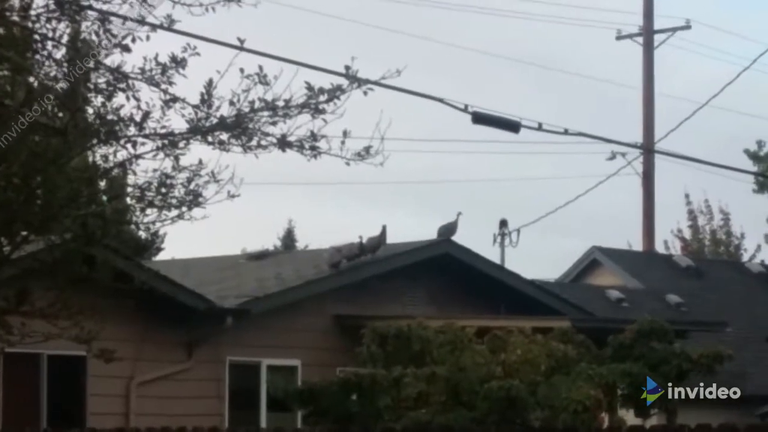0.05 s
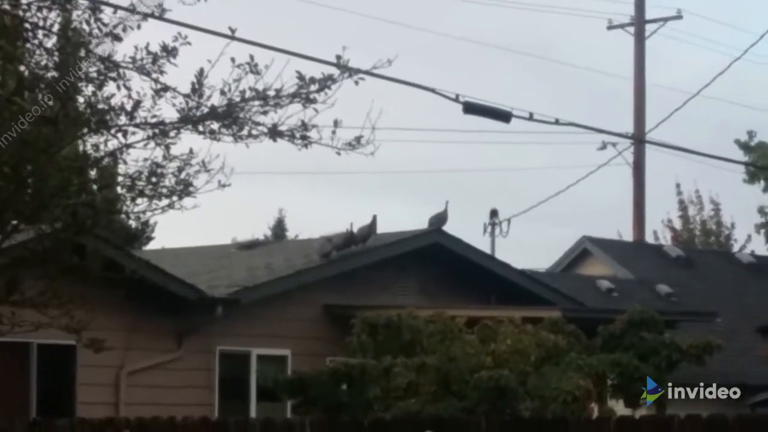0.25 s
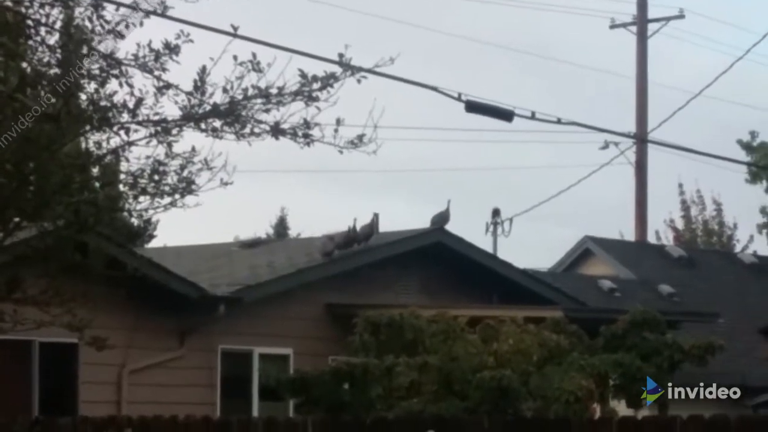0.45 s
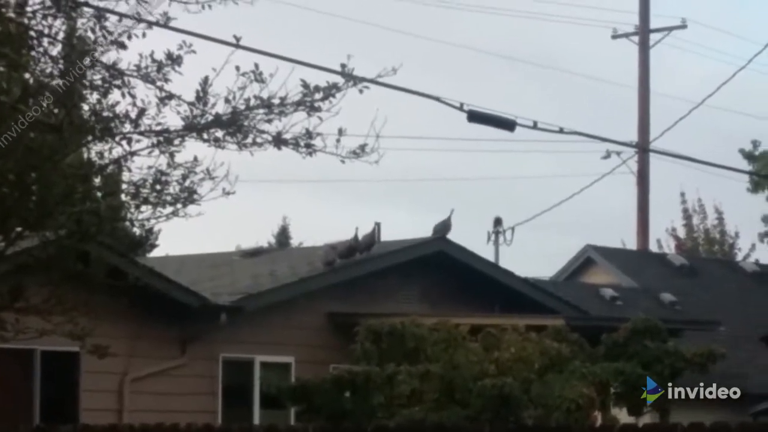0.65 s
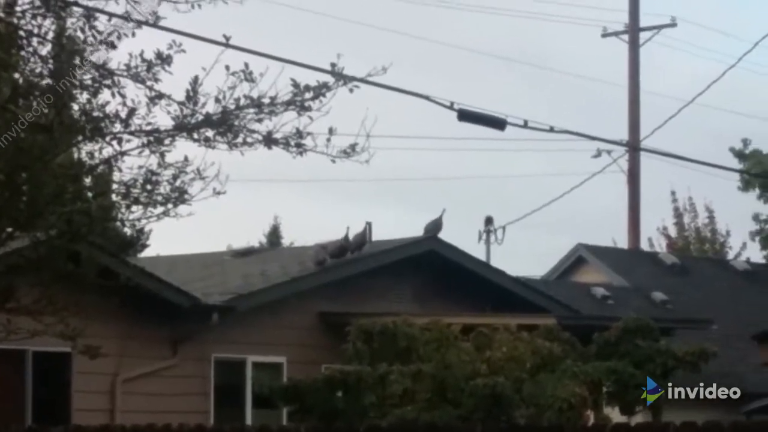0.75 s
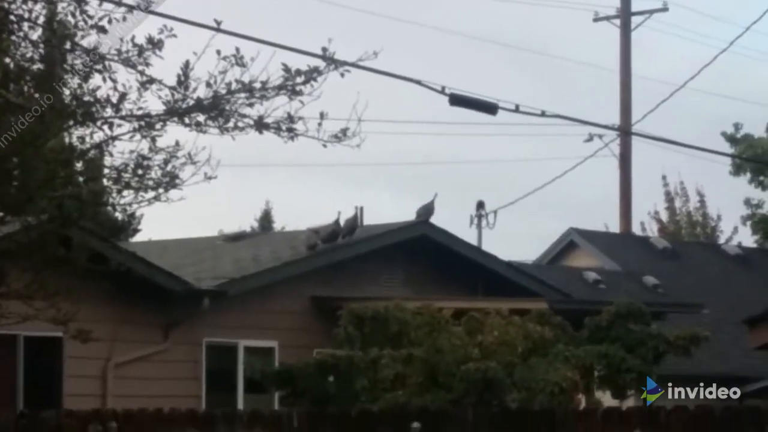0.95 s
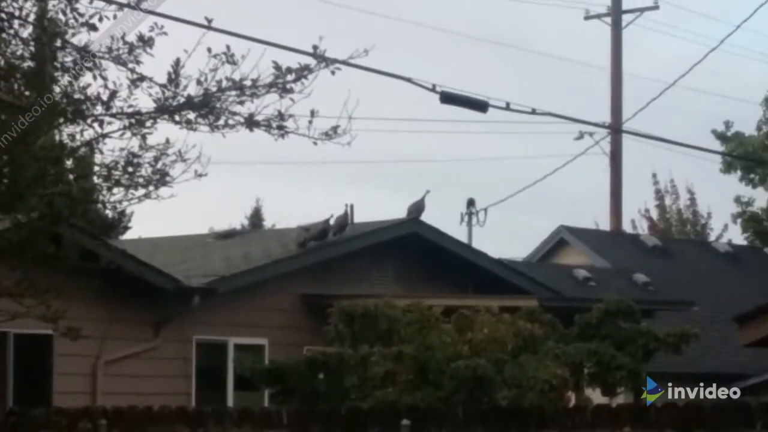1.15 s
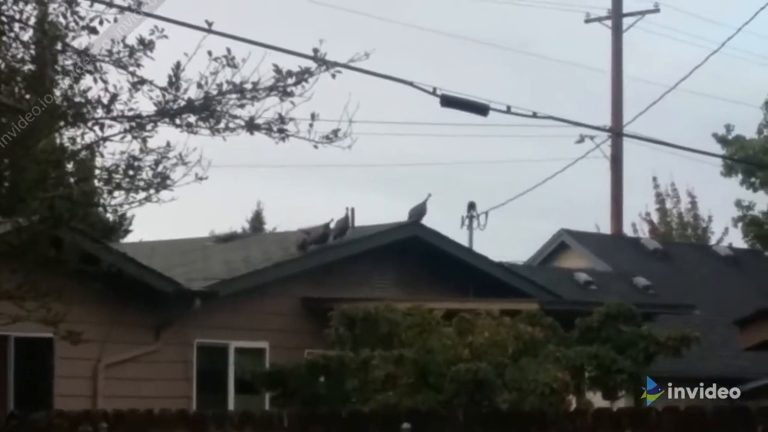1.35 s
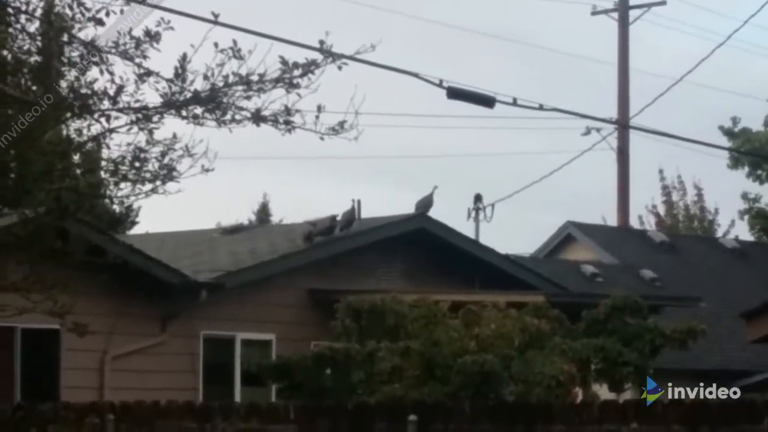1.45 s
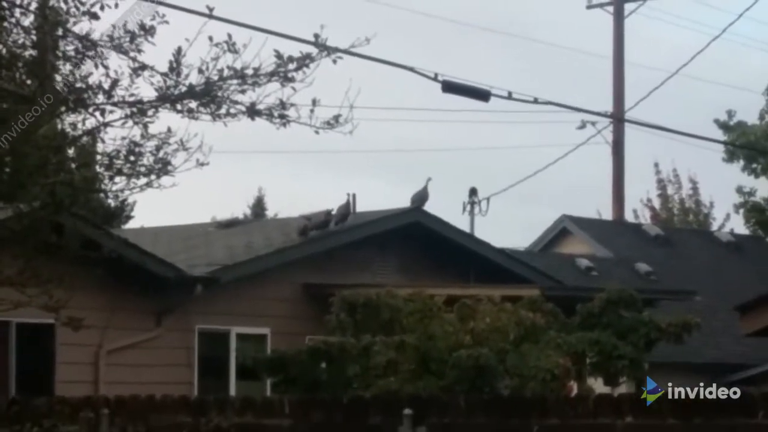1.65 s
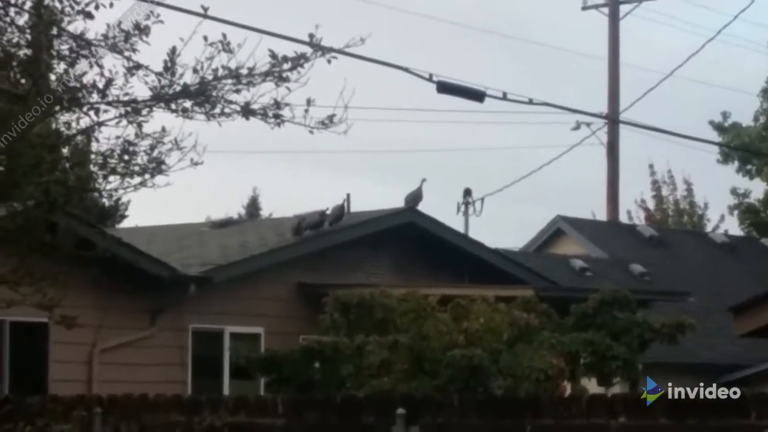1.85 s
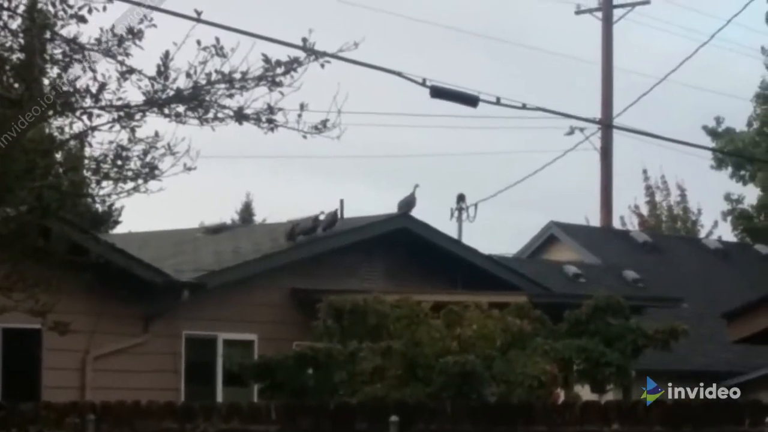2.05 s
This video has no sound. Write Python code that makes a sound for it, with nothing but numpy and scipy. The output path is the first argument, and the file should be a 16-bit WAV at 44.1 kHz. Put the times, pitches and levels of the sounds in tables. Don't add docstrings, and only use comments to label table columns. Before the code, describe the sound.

Harsh guinea fowl calls, short rasps with clucks and thin chirps, echo lightly across a quiet street.

```python
import sys
import numpy as np
from scipy import signal
from scipy.fft import rfft, irfft
from scipy.io import wavfile
from scipy.ndimage import uniform_filter1d

SR = 44100
rng = np.random.default_rng(int(sys.argv[2]) if len(sys.argv) > 2 else 0)


def makeup_ratio(level_db):
    decades = np.asarray(level_db, float) / 20
    return 10 ** decades


def generate_wav(sig):
    pcm = np.round(np.clip(np.atleast_2d(sig).T, -1, 1) * 32767).astype(np.int16)
    wavfile.write(sys.argv[1], SR, pcm)


N = 92610
LEAD = SR // 10

# (frequency [Hz], width [Hz], level [dB])
WINDPIPE = [(507, 620, -12), (1005, 580, -4.5), (1700, 500, -3), (2250, 530, -1), (2800, 350, 1),
            (3343, 330, -3), (4042, 444, 2.5), (4750, 900, -6), (7090, 4000, -13.5), (11500, 5600, -30)]


def evened(x):
    return x / np.sqrt(np.mean(x ** 2) + 1e-20)


def read(points, hz):
    f, value = np.transpose(points)
    return np.interp(np.log(hz + 1), np.log(f + 1), value)


def add(mix, s, sound):
    part = mix[LEAD + round(s * SR):][:len(sound)]
    part += sound[:len(part)]


def drift(chance, span_s):
    span = max(2, round(span_s * SR))
    return evened(uniform_filter1d(uniform_filter1d(chance, span), span))


def resonate(x, hz, width):
    turn = np.exp(2j * np.pi * np.cumsum(hz * np.ones(len(x))) / SR)
    r = np.exp(-np.pi * width / SR)
    once = signal.lfilter([1 - r], [1, -r], x / turn)
    twice = signal.lfilter([1 - r], [1, -r], once)
    return 2 * (turn * twice).real


def rasp(chance, start, length, effort_db, rate_hz, beak_hz):
    jitter, shimmer_db, breathiness = .06, 2.3, .35
    rise_s, fall_s, rounding = .004, 0.0028, 0.19
    beak_db, beak_width, beak_sag = 8, 0.29, 0.054
    wander, flicker_db = 0.039, 4
    t = np.arange(len(chance[0])) / SR

    turns = np.cumsum(rate_hz * np.exp(jitter * drift(chance[0], .0015))) / SR
    pulses = np.diff(np.floor(turns), prepend=0) * makeup_ratio(shimmer_db * chance[1])
    breath = (.6 + np.exp(-(turns % 1) / .5)) * chance[2]
    drive = evened(pulses - pulses.mean()) + breathiness * evened(breath)

    beak = beak_hz * (1 - beak_sag * t / length)
    out = 0
    for k, (hz, width, db) in enumerate(WINDPIPE):
        beak_gain_db = beak_db * np.exp(-(np.log(hz / beak) / beak_width) ** 2)
        flicker = flicker_db * np.tanh(drift(chance[3 + k][::-1], 0.0058))
        moving_hz = hz * (1 + wander * drift(chance[3 + k], 0.0083))
        ring = resonate(np.roll(drive, 9 * k), moving_hz, width)
        out = out + makeup_ratio(db + beak_gain_db + flicker) / np.sqrt(width) * ring

    rise = np.clip(t / (rise_s + rounding * length), 0, 1)
    fall = np.clip((length - t) / (fall_s + rounding * length), 0, 1)
    loud = np.sqrt(abs(uniform_filter1d(out ** 2, size=500)) + 1e-9)
    return makeup_ratio(effort_db) * np.sin(np.pi / 2 * rise * fall) * out / loud


def flock():
    # (start [s], length [s], effort [dB], pulse rate [Hz], beak resonance [Hz])
    rasps = [(-.06, 0.015, -26.5, 494.6, 3140), (0.196, 0.038, -37, 330, 3120),
             (0.432, 0.039, -32.5, 341, 3030), (0.658, 0.041, -38, 562.2, 3220),
             (0.804, 0.027, -35.5, 582.4, 3400), (0.821, 0.054, -43.5, 502, 4400),
             (.893, 0.034, -42.5, 576, 3200), (0.927, 0.0098, -34.5, 559, 3100),
             (1.06, 0.031, -27, 570, 2800), (1.078, 0.043, -27.5, 525.4, 2770),
             (1.118, 0.016, -35, 444, 3180), (1.249, 0.027, -31.5, 553.7, 2840),
             (1.277, 0.013, -29.5, 571, 4060), (1.286, 0.023, -35.5, 513.6, 2950),
             (1.316, 0.015, -36.5, 499, 3550), (1.375, 0.056, -38, 603.5, 3510),
             (1.565, 0.035, -32, 570, 2600), (1.598, 0.013, -31, 567, 4040),
             (1.676, 0.04, -36.5, 559.7, 3600), (1.726, 0.0094, -40, 568, 3750),
             (1.754, 0.048, -37, 563.6, 2860), (1.793, 0.027, -31.5, 559.3, 3200),
             (1.815, 0.017, -34.5, 563, 2310), (1.827, 0.016, -32, 564, 3400),
             (1.053, 0.013, -41, 560, 2880), (1.421, .035, -43, 599, 2490), (1.44, .08, -51, 430, 4900),
             (1.703, .024, -32.5, 560, 3100), (1.13, .075, -47, 499, 4900), (1.946, .02, -48, 500, 2100)]
    # (start [s], length [s], level [dB], pitch of the fundamental [Hz], fundamental re octave
    # [dB])
    clucks = [
        (0.659, 0.018, -42, 1680, -1),
        (0.679, 0.015, -36, 1660, -4),
        (0.806, 0.017, -34, 1700, -3.5),
        (.898, 0.015, -36.5, 1716, -10),
        (0.925, 0.013, -33.5, 1652, -14.5),
        (0.932, 0.012, -48, 1784, 9),
        (1.318, 0.012, -30.5, 1540, -7),
        (2.024, 0.011, -50, 1540, 1.5),
    ]
    # (start [s], length [s], level [dB],
    # first pitch [Hz], last pitch [Hz])
    notes = [(.242, .009, -45, 3000, 3050), (0.249, 0.021, -39, 3430, 3595),
             (.277, 0.0073, -49.5, 4200, 4220), (0.263, 0.011, -45.5, 3900, 4230),
             (0.43, 0.008, -37.5, 2830, 2800), (0.456, 0.018, -36.5, 3403, 3310),
             (0.668, 0.013, -33, 2866, 3000), (.657, .008, -40, 2900, 2950),
             (0.699, 0.012, -31, 4500, 3400), (.796, .017, -29.5, 2990, 3045),
             (.893, 0.0081, -35.5, 2860, 2900), (1.246, .011, -29.5, 2700, 2650),
             (1.281, 0.013, -30, 2300, 2263), (1.385, 0.02, -37, 2634, 2630),
             (1.569, 0.016, -29, 2837, 2810), (1.574, 0.021, -31, 2130, 2250),
             (1.601, 0.015, -29, 2250, 2330), (1.813, 0.011, -32.5, 2350, 2210),
             (1.83, 0.013, -30, 2156, 2180), (1.949, 0.005, -42, 1960, 1874),
             (2.075, .017, -39, 3950, 2860), (0.444, 0.011, -35, 4150, 4380),
             (1.681, 0.019, -41, 4200, 4260), (1.06, 0.021, -31, 2760, 2697),
             (1.097, 0.015, -34, 2380, 2283), (1.107, 0.011, -34, 2710, 2670),
             (.191, .009, -47, 3400, 3350), (.198, .01, -39, 2930, 3000), (.205, .01, -37, 3250, 3000),
               (.212, 0.018, -39, 2500, 2520), (0.21, .012, -41.5, 3500, 3260),
               (.202, 0.036, -43.5, 3950, 3760), (.439, 0.028, -34.5, 2900, 3010),
               (.446, 0.0255, -36.5, 2850, 2520), (1.1, 0.0154, -36, 2400, 3160),
               (1.797, 0.015, -29.5, 2597, 2740), (1.381, 0.046, -45.5, 4700, 4400),
               (1.5, 0.015, -45, 3550, 3900), (1.407, .016, -47, 4300, 3500),
               (1.424, 0.021, -41, 2590, 2620), (1.691, 0.021, -39.5, 3150, 3350),
               (1.712, .008, -34.5, 2980, 3000), (1.757, 0.026, -42, 3020, 2900),
               (1.795, 0.017, -36.5, 3400, 3400), (1.8, .018, -38.5, 3850, 4100),
               (1.061, 0.023, -37, 4050, 4000), (1.09, 0.015, -36.5, 1696, 1780),
               (1.562, .008, -39, 2500, 2650), (1.583, .01, -33, 2680, 2600),
               (1.572, .018, -38, 3900, 4050), (1.6, .01, -32, 4200, 4300), (1.6, .01, -33, 3850, 3880),
               (1.601, .007, -35, 3400, 3420), (1.09, .016, -37, 3950, 4120), (.665, .009, -42, 3950, 3900),
               (1.827, .012, -34, 4050, 4000), (1.3, 0.021, -41, 2300, 2200), (1.113, 0.026, -42, 862, 850),
               (1.074, .014, -33, 2300, 2240)]
    # (start [s], length [s], level [dB])
    sprays = [(.2, 0.032, -68), (0.435, .036, -57), (0.664, .03, -62), (.8, .035, -58), (.9, .04, -67),
              (1.065, 0.051, -60), (1.256, 0.052, -61), (1.317, .014, -59), (1.39, .04, -66),
              (1.572, 0.05, -62), (1.69, 0.038, -58.5), (1.789, .05, -65)]
    mix = np.zeros(LEAD + N)
    for row in rasps:
        add(mix, row[0], rasp(rng.standard_normal((3 + len(WINDPIPE), 3600)), *row))
    for s, length, db, hz, low_db in clucks:
        note = whistle(rng.standard_normal(1600), length, hz / 1.025, hz * 1.01, [low_db, 0, -31])
        add(mix, s, makeup_ratio(db) * note)
    for s, length, db, first_hz, last_hz in notes:
        note = whistle(rng.standard_normal(3000), length, first_hz, last_hz, [0, -38])
        add(mix, s, makeup_ratio(db) * note)
    for s, length, db in sprays:
        add(mix, s, makeup_ratio(db) * spray(rng.standard_normal((2, 3600)), length))
    return mix


def street(x):
    # (frequency [Hz], time to fall by 60 dB [s])
    decay = [(1000, 1), (3000, 0.81), (5000, 1.1), (9000, 0.64)]
    echo_db, near_db = -9.5, -8
    taps = np.zeros((2, SR))
    at = np.arange(400, SR - 20, 20) + rng.integers(0, 20, (2, (SR - 401) // 20))
    np.put_along_axis(taps, at, rng.choice([-1., 1.], at.shape), 1)
    hz, t, z = signal.stft(taps, SR, nperseg=256)
    fading = z * makeup_ratio(-60 * t / read(decay, hz)[:, None])
    tail = signal.istft(fading, SR, nperseg=256)[1][:, :SR]

    near = np.zeros((1, SR))
    np.put_along_axis(near, rng.integers(4, 200, (1, 6)), rng.choice([-1., 1.], (1, 6)), 1)
    near = signal.lfilter([1, -.8], [1, -.7], near)
    room = makeup_ratio(echo_db) * tail / np.linalg.norm(tail[0])
    room = room + makeup_ratio(near_db) * near * [[1], [-1]] / np.sqrt(6)
    return signal.fftconvolve(x[None], room, axes=1)[:, :len(x)]


def airy(spectrum, level_db, patchy_db, swell_db):
    # (frequency [Hz], coherence [-1 to 1])
    coherence = [(60, .994), (250, .98), (500, 0.82), (1000, 0.058), (3000, 0.04), (15000, 0.093)]
    lean_db = 0.5
    frames, hz = N // 256 + 5, np.fft.rfftfreq(1024, 1 / SR)
    a, b, c, d, patches = rng.standard_normal((frames, 513, 5)).T
    patches = evened(uniform_filter1d(uniform_filter1d(patches, 8, 0), 8, 1))
    swell = evened(uniform_filter1d(rng.standard_normal(frames), 12))
    same = np.clip(read(coherence, hz), -1, 1)[:, None]
    left = a + 1j * b
    right = same * left + np.sqrt(1 - same ** 2) * (c + 1j * d)
    lean = lean_db / 2 * np.array([1, -1])[:, None, None]
    gain_db = read(spectrum, hz)[:, None] + lean + patchy_db * patches + swell_db * swell
    z = np.array([left, right]) * makeup_ratio(gain_db)
    return makeup_ratio(level_db) * evened(signal.istft(z, nperseg=1024, noverlap=768)[1][:, :N])


def drone():
    # (time [s], pitch [Hz], level [dB], octave level [dB])
    course = [
        (0, 190.8, -60.5, -72),
        (.45, 190, -53, -56),
        (.6, 188.8, -59, -68),
        (1.051, 188, -62.5, -61),
        (1.1, 187, -58.5, -47),
        (1.18, 188.3, -66, -65.5),
        (1.65, 185.5, -58, -62.5),
        (2.1, 183.6, -59, -75),
    ]
    s, hz, db, octave_db = np.transpose(course)
    t = np.arange(N) / SR
    turns = np.cumsum(np.interp(t, s, hz) * (1 + .02 * drift(rng.standard_normal(N), .02))) / SR
    flutter = makeup_ratio(3.2 * drift(rng.standard_normal(N), 0.035))
    tone = makeup_ratio(np.interp(t, s, db)) * np.sin(2 * np.pi * turns)
    octave = makeup_ratio(np.interp(t, s, octave_db)) * np.sin(4 * np.pi * turns)
    return np.sqrt(2) * flutter * (tone + octave)


def whistle(chance, length, first_hz, last_hz, parts_db):
    glide, waver_db = 2.2, 1.2
    swoop_db = 40
    u = np.linspace(0, 1, round(length * SR))
    turns = np.cumsum(last_hz + (first_hz - last_hz) * (1 - u) ** glide) / SR
    tone = sum(makeup_ratio(db) * np.sin(2 * np.pi * (k + 1) * turns) for k, db in enumerate(parts_db))
    fall_octaves = np.log2(last_hz / np.maximum(first_hz, last_hz))
    swoop = swoop_db * fall_octaves * (1 - u) ** 2
    waver = waver_db * drift(chance, 0.00058)[:len(u)]
    return np.sqrt(2) * tone * abs(np.sin(np.pi * u)) ** 0.55 * makeup_ratio(swoop + waver)


def spray(chance, length):
    u = np.linspace(0, 1, round(length * SR))
    air = resonate(np.diff(chance[0], prepend=0), 8500, 7000)
    air = air * makeup_ratio(5 * drift(chance[1], 0.0011))
    return evened(air)[:len(u)] * abs(np.sin(np.pi * u ** 0.76)) ** .6


def bumps():
    # (start [s], level [dB], frequency [Hz], length [s])
    pushes = [
        (.508, -42.5, 179, 0.039),
        (1.05, -46, 115.6, 0.066),
        (1.222, -51.5, 92.59, 0.11),
    ]
    mix = np.zeros(LEAD + N)
    for s, db, hz, length in pushes:
        t = np.arange(round(length * SR)) / SR
        swing = np.sin(2 * np.pi * hz * t * (1.2 - 0.295 * t / length))
        swirl = evened(resonate(rng.standard_normal(5000), hz, 0.58 * hz))[:len(t)]
        add(mix, s, makeup_ratio(db) * (swing + 0.71 * swirl) * np.hanning(len(t)))
    return mix[LEAD:]


def scene():
    # (frequency [Hz], level difference [dB])
    port_tilt = [(1000, 4), (2500, -0.5), (4000, 4.5), (8000, 3.5)]
    # (frequency [Hz], density [dB per Hz])
    wash = [(50, -27), (75, -3), (260, -14), (500, -11), (950, -2.5), (1800, -12), (4200, -21.5),
            (6000, -35)]
    # (frequency [Hz], density [dB per Hz])
    hiss_spectrum = [(3000, 5.5), (6000, 0.5), (9000, -3), (13000, -0.5), (15800, -4)]
    port_lag_s, scatter = .00002, .75
    birds = flock()
    hz = np.fft.rfftfreq(len(birds), 1 / SR)
    blur = drift(rng.standard_normal(len(birds)), .001)
    side = np.array([[.5], [-.5]])
    ports = makeup_ratio(side * read(port_tilt, hz)) * np.exp(2j * np.pi * hz * side * port_lag_s)
    echo = street(birds * np.sqrt(1 - scatter) + np.sqrt(scatter) * birds * blur)
    heard = irfft(rfft(birds + echo) * ports, len(birds))[:, LEAD:]
    traffic = airy(wash, -44, patchy_db=1.5, swell_db=0.51)
    hiss = airy(hiss_spectrum, -60, patchy_db=3.2, swell_db=1)
    return heard + traffic + hiss + drone() + bumps()


def low_pass(x):
    return signal.sosfilt(signal.butter(12, 15790, fs=SR, output="sos"), x)


def record(dry):
    lowpass = signal.firwin(511, 15780, window=("kaiser", 9), fs=SR)
    mix = signal.oaconvolve(dry, lowpass[None], "same")
    return low_pass(mix)


dry = scene()
out = record(dry)
generate_wav(out)
```